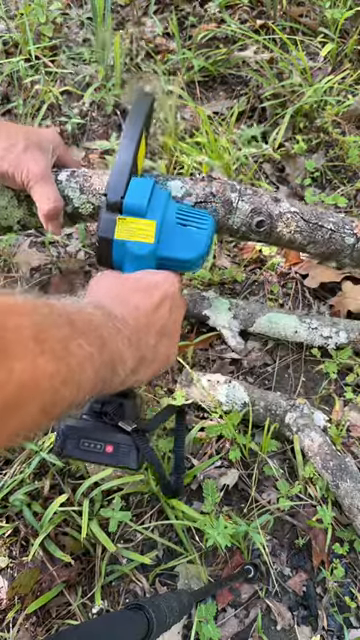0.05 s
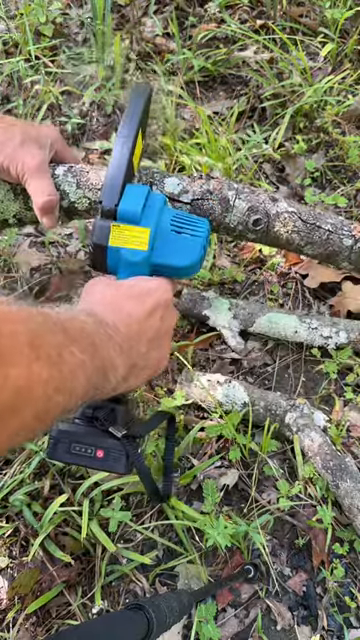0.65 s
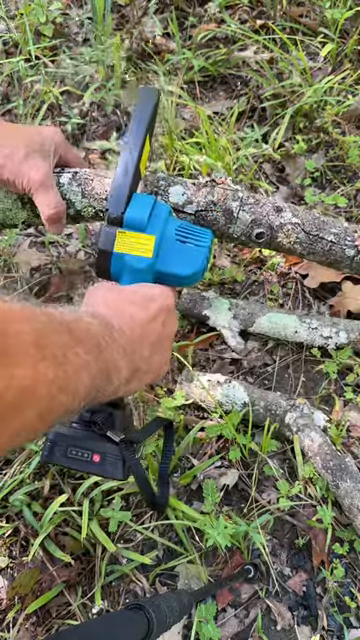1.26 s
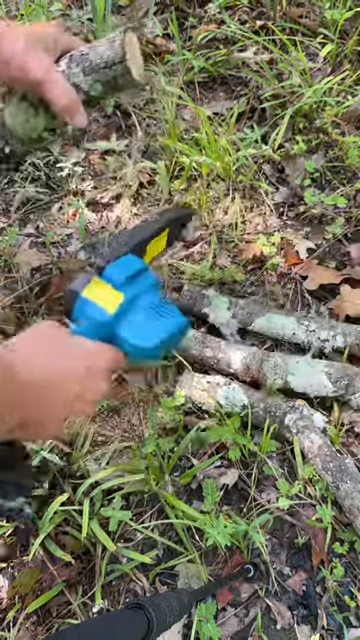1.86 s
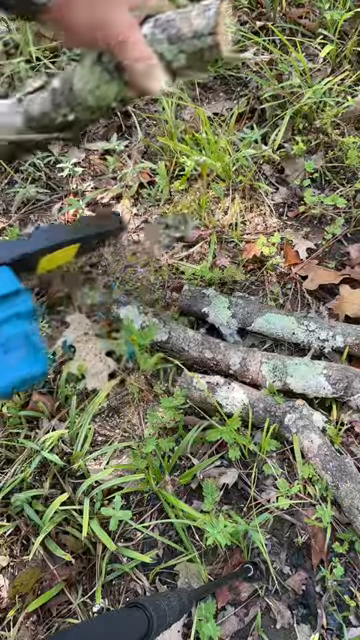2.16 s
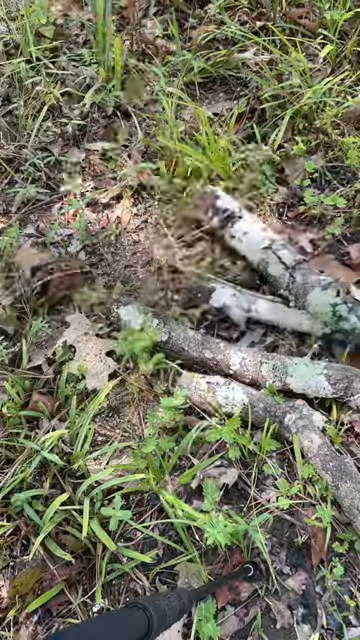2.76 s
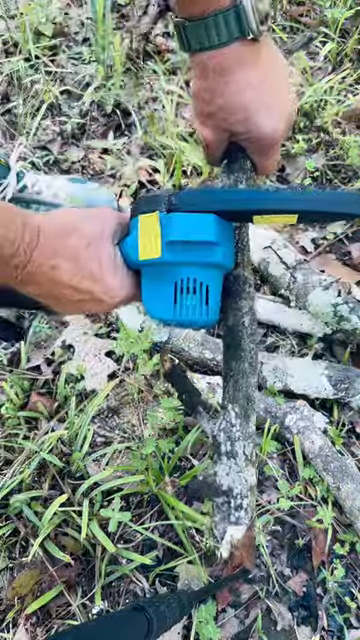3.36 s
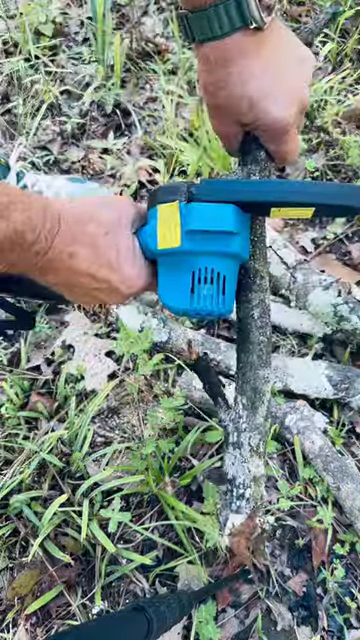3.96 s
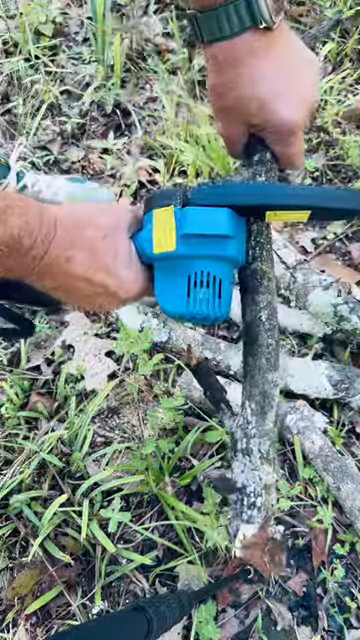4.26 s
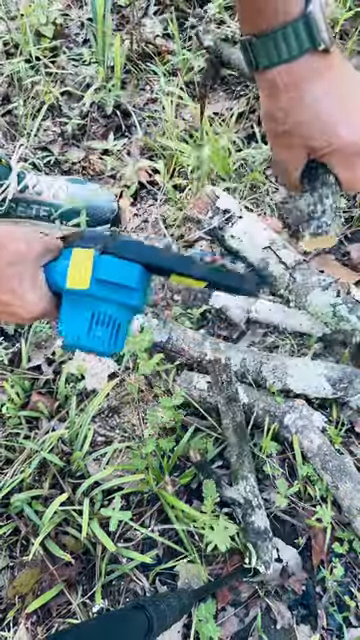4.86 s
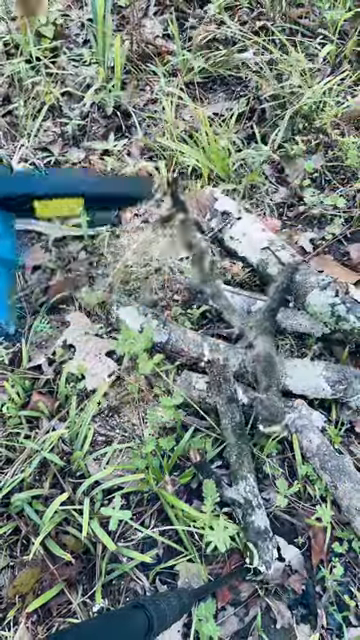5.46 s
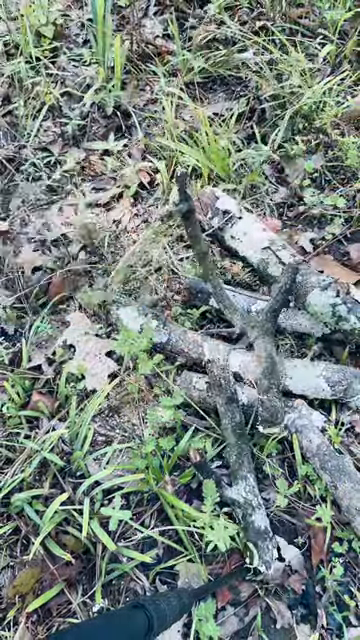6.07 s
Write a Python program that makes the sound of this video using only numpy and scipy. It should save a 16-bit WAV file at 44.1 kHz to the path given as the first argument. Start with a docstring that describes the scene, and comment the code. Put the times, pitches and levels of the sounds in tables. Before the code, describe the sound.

Close up, a small electric chainsaw rasps through a limb, coasts to a stop, then cuts a branch, with wooden knocks after each cut.

```python
"""A small battery chainsaw, close to the microphone outdoors, cuts a limb and then a branch.
Its chain rattles and rasps in step with the motor, the gears whine, and it coasts to a stop after each cut.
The chain squeals in the limb's kerf, low hums come and go, and the cut pieces knock onto a wood pile.
Leaves and distant insects hiss faintly behind, over a low rumble."""
import sys
import numpy as np
from scipy import signal
from scipy.fft import rfft, irfft, next_fast_len
from scipy.io import wavfile
from scipy.ndimage import uniform_filter1d, map_coordinates

SR = 44100
rng = np.random.default_rng(int(sys.argv[2]) if len(sys.argv) > 2 else 0)


def persist_wave(psi):
    """Save psi, clipped to +-1, as 16-bit WAV."""
    counts = np.round(np.clip(psi, -1, 1) * 32767).astype(np.int16)
    wavfile.write(sys.argv[1], SR, np.atleast_2d(counts).T)


N = 273861
TIME = np.arange(N) / SR

# motor speed in the limb, dragged down as the kerf deepens: t/s, rotation/Hz
LIMB_SPEED = [(0, 328), (.28, 318), (.42, 360), (.62, 361), (.85, 348), (1.25, 342), (1.36, 322),
              (1.42, 328), (1.47, 356), (1.54, 402), (1.62, 418)]
# trigger pulled/s, cut through/s, trigger released/s, at rest/s, coast time/s, bow of the slowing curve
LIMB_TIMING = (-.2, 1.48, 1.65, 2.735, 1.26, .67)
# motor and sprocket drone: multiple of motor speed, base level at the limb/dB, at the branch/dB
DRONE_TONES = [(.5, -58, -66), (.84, -53, -54.5), (1, -53, -55.5), (1.5, -56, -54), (2, -56, -46),
               (3, -47.5, -46)]
# the plastic housing lifts or muffles passing tones: f/Hz, width/Hz, lift at limb/dB, at branch/dB
HOUSING_BANDS = [(215, 90, -8, -2), (352, 70, 9.5, 9.5), (500, 150, -7, -6), (845, 130, 8, 8),
                 (1070, 90, 9, 10), (1250, 150, 4, 10), (1620, 450, -8, -10), (2130, 280, 15, 11),
                 (2380, 160, 2, -5), (2560, 200, -3, 7), (2900, 300, -3, -6), (3450, 330, -6, 8),
                 (3850, 300, -4, -8), (4200, 250, 0, 8), (4750, 900, -12, -15)]


def amp(db):
    """Decibels to gain."""
    return 10 ** (np.asarray(db) / 20)


def unit(x):
    """x at rms 1."""
    return x / np.sqrt(np.mean(x ** 2) + 1e-20)


def along(points, hz):
    """Interpolate (f/Hz, value) points on a log axis."""
    f, v = np.transpose(points)
    return np.interp(np.log(hz + 1), np.log(f + 1), v)


def between(start, end, edge):
    """1 from start to end, with ramps edge seconds long."""
    return np.clip(np.minimum(TIME - start, end - TIME) / edge + .5, 0, 1)


def wobble(rate):
    """A smooth random curve, rate knots a second."""
    return map_coordinates(rng.standard_normal(int(N * rate / SR) + 4), [TIME * rate])


def filtered(x, response):
    """x times a response of frequency."""
    m = next_fast_len(N + SR // 2)
    return irfft(rfft(x, m) * response(np.fft.rfftfreq(m, 1 / SR)), m)[..., :N]


def ringing(x, spectrum):
    """x through a causal (minimum-phase) filter with this spectrum, at rms 1."""
    def response(hz):
        cepstrum = irfft(np.log(amp(np.maximum(along(spectrum, hz), -100))))
        half = len(cepstrum) // 2
        cepstrum[1:half] *= 2
        cepstrum[half + 1:] = 0
        return np.exp(rfft(cepstrum))
    return unit(filtered(x, response))


def grit(spiky_db):
    """Dense tiny impacts of unequal size, rms 1."""
    size = np.repeat(amp(spiky_db * rng.standard_normal(N // 16 + 1)), 16)[:N]
    return unit(size * rng.standard_normal(N))


def pulsing(share, cycles, fall, scatter_db):
    """A steady envelope with a share of its power in decaying blows of random strength, one a cycle."""
    strength = amp(scatter_db * rng.standard_normal(size=8192))
    blows = unit(strength[cycles.astype(int) % len(strength)] * np.exp(-fall * (cycles % 1)))
    share = np.clip(share, 0, 1)
    return np.sqrt(1 - share + share * blows ** 2)


def outdoors():
    """Leaves, a far insect chorus and a low rumble, stepping abruptly in level."""
    stretches = [(0, -66.5, -73, -63.5), (2.859, -66.5, -52, -59.5), (5.58, -55, -59.5, -64.5),
                 (6.117, -73, -54.5, -57.5)]  # from t/s, leaves/dB, insects/dB, rumble/dB
    # spectra of the three: f/Hz, relative level/dB
    leaf_spectrum = [(100, -5.5), (300, -6.5), (900, -9.5), (2200, -12), (3200, -4), (4300, -1.5),
                     (5500, -3), (6400, -12), (8000, -6), (10000, -9), (12000, -18.5), (15500, -10.5)]
    insect_spectrum = [(200, -36.5), (2400, -26.5), (3200, -10), (4200, -6), (5500, -5), (7800, -0.5),
                       (9300, -3), (10500, -15), (15500, -22.5)]
    rumble_spectrum = [(22, -54), (46, 0.5), (60, -3.5), (90, 0), (140, -8.5), (300, -21), (700, -48)]
    starts, leaves_db, insects_db, rumble_db = np.transpose(stretches)
    now = np.searchsorted(starts[1:], TIME)
    leaves = amp(leaves_db[now]) * ringing(grit(spiky_db=2), leaf_spectrum)
    insects = amp(insects_db[now]) * ringing(rng.standard_normal(N), insect_spectrum)
    rumble = amp(rumble_db[now]) * ringing(rng.standard_normal(N), rumble_spectrum)
    return leaves + insects + rumble


def bumps(rise_s=.012, fall_db_per_s=172.5):
    """Ground and handling bumps reach the microphone as low, dying tones."""
    thumps = [(1.565, 100, -44.5), (2.503, 100.3, -41), (3.21, 70, -58), (4.655, 65, -41), (4.745, 58, -38),
              (5.215, 62.6, -42), (5.28, 46, -48)]  # t/s, f/Hz, level/dB
    out = np.zeros(N)
    for s, hz, db in thumps:
        age = np.maximum(TIME - s, 0)
        out += np.minimum(age / rise_s, 1) * amp(db - fall_db_per_s * age) * np.sin(2 * np.pi * hz * age)
    return out


def ticks(t60_s=.011):
    """The chain snaps taut or settles on its bar with a thin, dry tick."""
    snaps = [(2.76, -55), (3.1375, -22), (5.5637, -27)]  # t/s, level/dB
    tick_spectrum = [(200, -32), (550, -1), (900, -9), (1300, 3), (2600, -2), (4500, -13), (8300, 4),
                     (11000, -10), (15500, -17)]  # f/Hz, relative level/dB
    envelope = sum((TIME >= s) * amp(db - 60 * np.maximum(TIME - s, 0) / t60_s) for s, db in snaps)
    bursts = envelope * rng.standard_normal(N)
    return np.std(bursts) * ringing(bursts, tick_spectrum)


def low_hums(sag_per_s=.2):
    """Low, sagging hums while cutting; the last is the labouring motor's half-speed tone."""
    hums = [(0.07, 0.27, 250, -45), (1.158, 0.3, 105.8, -49), (4.15, 0.315, 183, -50)]  # t/s, length/s, starting f/Hz, level/dB
    out = np.zeros(N)
    for s, length, hz, db in hums:
        phase = 2 * np.pi * np.cumsum(hz * (1 - sag_per_s * np.clip(TIME - s, 0, length))) / SR
        level = between(s, s + length, edge=.08) * amp(db + 1.4 * wobble(48))
        out += level * np.sin(phase + .5 * wobble(50))
    return out


def knocks():
    """Each contact cracks, rings the wood briefly and bends it in a dull thud with one overtone."""
    # wood on wood and on the saw: t/s, clack level/dB, thud level/dB (before a 9 dB lift), thud f/Hz
    contacts = [(1.6355, -6, -30, 340), (2.42, -29, -55, 300), (2.43, -38, -37, 260),
                (2.454, -26, -44, 700), (2.486, -33, -31, 250), (2.5115, -21.5, -27.5, 480),
                (2.518, -26, -29, 235), (4.647, -18, -21, 680), (4.654, -9, -28, 290),
                (5.113, -23, -50, 500), (5.184, -22, -30, 560)]
    cutter_hits = [(1.2875, -16), (1.2975, -14), (1.307, -13), (1.3175, -14), (1.331, -19), (1.3425, -18),
                   (1.3865, -19), (1.396, -19), (1.405, -15), (1.4145, -16), (1.4212, -13), (1.437, -19),
                   (1.445, -15), (1.4605, -18)]  # cutters hammer through the last of the limb: t/s, clack/dB
    wood_modes = [(640, -22, 0.013), (1240, -14, 0.014), (1800, -9.5, 0.007), (2010, -16.5, 0.019),
                  (2660, -2, 0.0056), (3370, -17, 0.0055), (3700, -7.5, 0.0044)]  # f/Hz, relative level/dB, t60/s
    out, t = np.zeros(N + SR), np.arange(SR // 8) / SR
    strikes = [(s, db, db - 15, 580 * np.exp(.3 * rng.standard_normal())) for s, db in cutter_hits]
    for s, clack_db, thud_db, thud_hz in contacts + strikes:
        ring = sum(amp(db + rng.normal(0, 2.2) - 60 * t / t60)
                   * np.sin(2 * np.pi * hz * rng.normal(1, .062) * t + rng.uniform(0, 2 * np.pi))
                   for hz, db, t60 in wood_modes)
        grain = rng.standard_normal(len(t))
        crack = uniform_filter1d(grain, size=7) - uniform_filter1d(grain, size=22)
        clack = (ring + 1.5 * amp(-60 * t / .01) * crack) * (1 - np.exp(-t / .0005)) ** 2
        cycles = thud_hz * t
        bend = np.sin(2 * np.pi * cycles) + amp(-8.5) * np.sin(2 * np.pi * 2.67 * cycles)
        thud = amp(thud_db + 9 - 60 * cycles / 7) * (1 - np.exp(-t / .0008)) * bend
        out[round(s * SR):][:len(t)] += amp(clack_db) * clack / np.abs(clack).max() + thud
    # the knocks carry no deep bass below about 190 Hz
    return signal.sosfilt(signal.butter(2, 190, 'highpass', fs=SR, output='sos'), out[:N])


def motor_speed(timing, speeds, spin_up_s=.046, stall_s=.16):
    """Turns a second: the motor picks up, follows the load, coasts, and stalls on the chain's friction."""
    pulled, _, released, rest, coast_s, bow = timing
    pick_up = 1 - np.exp(-np.maximum(TIME - pulled, 0) / spin_up_s)
    left = np.clip(1 - (TIME - released) / coast_s, 0, 1)
    coast = left * (1 - bow * (1 - left))
    stall = np.clip((rest - TIME) / stall_s, 0, 1) ** .5
    return np.interp(TIME, *np.transpose(speeds)) * pick_up * coast * stall


def squeal(fade_db_per_s=10):
    """The chain rubs the limb's kerf and sings a wavering note with its octave, in step with the motor."""
    rubs = [(.38, 1.285, .92, -26.5), (1.395, 1.48, 1.45, -28)]  # start/s, end/s, loudest moment/s, peak level/dB
    level = sum(between(start, end, edge=.042) * amp(db - fade_db_per_s * np.abs(TIME - peak))
                for start, end, peak, db in rubs)
    waver = 1 + .008 * wobble(200) + .012 * wobble(35) + .008 * wobble(9)
    phase = 2 * np.pi * np.cumsum(9 * motor_speed(LIMB_TIMING, LIMB_SPEED) * waver) / SR
    octave = amp(-4.5) * np.sin(2 * phase + wobble(300))
    return level * amp(1.8 * wobble(60)) * (np.sin(phase) + octave)


def catches(even_chatter=.05):
    """The chain catches and skips, on the wood or slack on its bar: swells of level (dB) and chatter."""
    snags = [(0.25, 0.29, 5.5, 0.4), (1.33, 0.12, 5, 0.4), (1.418, 0.077, 5, 0.2),
             (3.491, 0.033, 5.5, 0.03), (3.661, 0.151, 4, 0.02), (4.094, 0.28, 1.5, 0),
             (5.427, 0.43, 2.5, 0)]  # t/s, length/s, lift before each layer's share/dB, added chatter (0-1)
    swells = np.array([np.cos(np.pi * np.clip((TIME - s) / length, -.5, .5)) ** 2
                       for s, length, _, _ in snags])
    _, _, db, depth = np.transpose(snags)
    return db @ swells, even_chatter + depth @ swells


def bar_ring(impacts):
    """The steel bar rings in narrow modes under the links, at rms 1."""
    modes = [(2146, 90, -1), (4186, 290, -3.5), (5305, 200, -11), (7740, 330, 4)]  # f/Hz, width/Hz, relative level/dB
    return unit(filtered(impacts, lambda f: sum(
        amp(db) * 1j * f * width / (hz ** 2 - f ** 2 + 1j * f * width) for hz, width, db in modes)))


def saw(timing, speeds, levels, body_spectrum, rasp_spectrum, hiss_spectrum, tones, housing, load_db):
    """One run of the saw: links tick on the bar, cutters bite, the motor drones and the gears whine."""
    full_hz, whine_fade_hz = 430, 134  # motor speeds
    pulled, through, released, rest, _, _ = timing
    speed = motor_speed(timing, speeds)
    turns = np.cumsum(np.maximum(speed, 40) * (1 + .003 * wobble(45))) / SR
    pace = np.clip(speed / full_hz, 1e-4, 1)
    elapsed = TIME - pulled
    starting = between(-np.inf, pulled + .06, edge=.03)
    in_wood = between(-np.inf, through, edge=.023)
    coasting = between(released, np.inf, edge=.052)

    surge_db = 8.5 * np.exp(-np.maximum(elapsed, 0) / .066)  # starting torque slams the chain round
    drive_db = 20 * np.log10(pace) + .52 * coasting + surge_db
    catch_db, chatter = catches()
    body_db, rasp_db, hiss_db, ring_db = [
        free_db + drive_db + in_wood * (cut_db - loss * elapsed) + catch_share * catch_db
        for (free_db, cut_db, loss), catch_share in zip(levels, (.84, .45, .36, 0))]
    # links land on the sprocket; single ticks stand out a little as the chain slows
    links = pulsing(.37 + .4 * (1 - pace), 6 / 7 * turns, fall=.85, scatter_db=2.5)
    bites = pulsing(chatter, .26 * turns, fall=3.5, scatter_db=1.5)
    body = amp(body_db - .5) * ringing(grit(spiky_db=1.5) * links * bites, body_spectrum)
    # the wood carries the low end, which drops once the chain runs free
    low_end = filtered(body, lambda hz: 1 / (1 + (hz / 600) ** 4))
    body -= (1 - in_wood) * (1 - amp(-6)) * low_end
    rasp = amp(rasp_db) * ringing(grit(spiky_db=1.5) * links * bites, rasp_spectrum)
    hiss = amp(hiss_db + 3) * ringing(grit(spiky_db=1) * links, hiss_spectrum)
    ring = amp(ring_db) * bar_ring(grit(spiky_db=3) * links)

    def tone(multiple, flutter):
        """A multiple of the shaft speed, shaken by play in the drive and coloured by the housing."""
        lift_db = sum(db / (1 + (2 * (multiple * speed - hz) / width) ** 2) for hz, width, db in housing)
        level = amp(lift_db + 4 * flutter * wobble(35))
        return level * np.sin(2 * np.pi * multiple * turns + flutter * wobble(90))

    # the motor drones loudest and steadiest under load, and fades as it slows
    drone = sum(amp(db) * tone(multiple, flutter=.25 - .08 * in_wood) for multiple, db in tones)
    drone *= amp(load_db * in_wood) * pace ** 2
    # the twelve-tooth pinion sings out as it spins up or coasts, and dies near rest
    whine_db = rasp_db - 24 + 18 * (coasting + starting) + 1.2 * wobble(14) + 2 * (1 - pace)
    gears = amp(whine_db) * (tone(12, flutter=.45) + amp(-6) * tone(24, flutter=.7))
    gears *= np.clip(speed / whine_fade_hz, 0, 1) ** 4
    # the ten-blade cooling fan whistles near top speed
    free_rasp_db = levels[1][0]
    fan = amp(free_rasp_db - 10 + 4 * in_wood - 6 * coasting) * pace ** 12 * tone(10, flutter=.7)
    return between(pulled, rest, edge=.005) * (body + rasp + hiss + ring + drone + fan + gears)


def limb_cut():
    """The saw, already running, labours through the limb and coasts to rest."""
    # rows body, rasp, hiss, bar ring: base level/dB, added in wood/dB, loss as the bar sinks/(dB/s)
    levels = [(-39.5, 7.5, 0.5), (-31, 8, 1.4), (-26.5, 4, 1.63), (-31, -4.5, 2.5)]
    # spectra of the saw's body, rasp and hiss, with the top treble thinned: f/Hz, relative level/dB
    body = [(65, -34), (110, -20.5), (130, -20), (163, -12), (353, -6), (422, -8), (565, -7.5), (668, -2),
            (894, -0.5), (1020, 1), (1250, -2), (1600, -6), (2080, -22), (3520, -120)]
    rasp = [(820, -42), (1400, -4.5), (1600, -4), (1740, -2.5), (1910, -3), (2100, 4), (2350, -0.5),
            (2650, 1.5), (3260, -2), (3600, -2), (4900, -17), (6370, -51.5), (10800, -120)]
    hiss = [(3500, -49), (4800, -17), (5400, -3), (6300, -2), (7500, -4), (8050, -2.5), (10000, -5.5),
            (11800, -3), (13500, -17.5), (15500, -3)]
    tones = [(multiple, db) for multiple, db, _ in DRONE_TONES]
    housing = [(hz, width, db) for hz, width, db, _ in HOUSING_BANDS]
    return saw(LIMB_TIMING, LIMB_SPEED, levels, body, rasp, hiss, tones, housing, load_db=1.5)


def branch_cut():
    """The saw starts again and takes the branch faster, with a brighter rasp and a stronger drone."""
    timing = (3.134, 4.49, 4.6, 5.62, 1.02, .38)  # columns as in LIMB_TIMING
    speeds = [(3.3, 423), (3.45, 421), (3.7, 414), (3.82, 407), (3.99, 406), (4.04, 378), (4.11, 390),
              (4.18, 362), (4.25, 364), (4.31, 350), (4.38, 358), (4.44, 359), (4.52, 410), (4.6, 425)]  # t/s, motor rotation/Hz
    # layer levels and spectra, laid out as in limb_cut
    levels = [(-34.5, 6, 0.75), (-28.5, 8, 4), (-24.5, 5.5, 1.5), (-32, -0.5, -6)]
    body = [(76, -38), (130, -25), (182, -23), (274, -15), (349, -12), (444, -11.5), (509, -15.5),
            (609, -3.5), (767, -2.5), (889, -4.5), (1220, 2), (1500, -8), (1600, -3.5), (2080, -10.5),
            (3520, -120)]
    rasp = [(820, -49), (1400, -4.5), (1550, -14), (1800, -1), (1990, -3), (2120, 0.5), (2570, 1.5),
            (3580, -3), (4190, -5.5), (4510, -8), (4900, -8.5), (6370, -12.5), (10800, -120)]
    hiss = [(3500, -41.5), (4800, -18.5), (5400, -4), (6300, -1.5), (7000, -2.5), (7500, 1), (8200, -3),
            (10000, -4), (11800, -14), (13500, -8.5), (15500, -12.5)]
    tones = [(multiple, db) for multiple, _, db in DRONE_TONES]
    housing = [(hz, width, db) for hz, width, _, db in HOUSING_BANDS]
    return saw(timing, speeds, levels, body, rasp, hiss, tones, housing, load_db=6.5)


def scene():
    """Everything reaches a close stereo microphone, with shifting scatter from the undergrowth."""
    side_spectrum = [(100, -29), (500, -12.5), (1200, -41.5), (3500, -69.5), (4800, 3.5), (5800, -23),
                     (8000, -8.5), (10500, -5), (11800, -31.5), (13800, -64.5), (15000, -10)]  # scatter, opposite in left and right: f/Hz, level/dB
    direct = limb_cut() + branch_cut() + squeal() + low_hums() + knocks() + ticks() + bumps() + outdoors()
    t = np.arange(SR // 16) / SR
    undergrowth = rng.standard_normal(len(t)) * amp(-60 * t / .1)
    echo = signal.fftconvolve(direct, undergrowth / np.linalg.norm(undergrowth))[:N]
    shifting = np.sqrt(2) * np.cos(2 * np.pi * wobble(40))
    scatter = filtered(echo * shifting, lambda hz: amp(along(side_spectrum, hz)))
    return np.array([direct + scatter, direct - scatter])


def record(dry):
    """Left and right drift out of phase in the treble, widening the hiss; peaks are rounded, band ends cut."""
    phase_gap = [(50, 0), (5500, 0), (6700, .1), (8000, .95), (10000, 2), (11400, 3), (14000, 3.25),
                 (15700, 4.2)]  # f/Hz, phase between left and right/rad
    ceiling, bass_hz, top_hz = .95, 45, 15780
    wide = filtered(dry, lambda hz: np.exp(.5j * np.outer([1, -1], along(phase_gap, hz))))
    rounded = wide / (1 + np.abs(wide / ceiling) ** 6) ** (1 / 6)
    return filtered(rounded, lambda hz: np.clip(hz / bass_hz, 0, 1) ** 3
                    * np.clip((top_hz - hz) / 200 + .5, 0, 1))


dry = scene()
out = record(dry)
persist_wave(out)
```